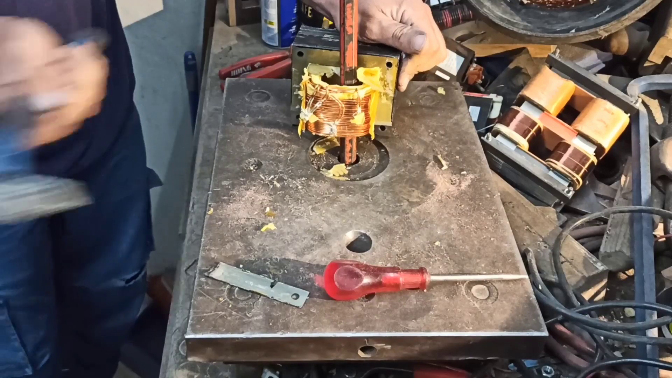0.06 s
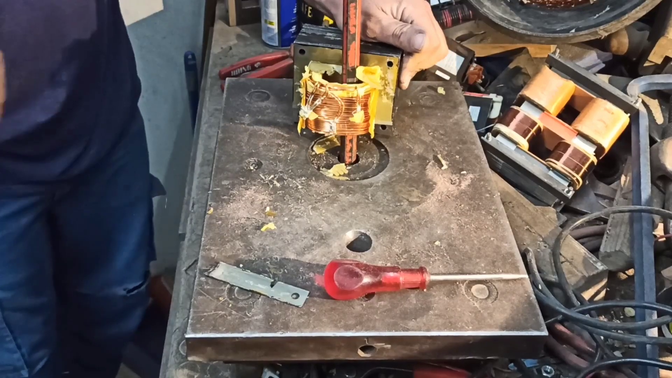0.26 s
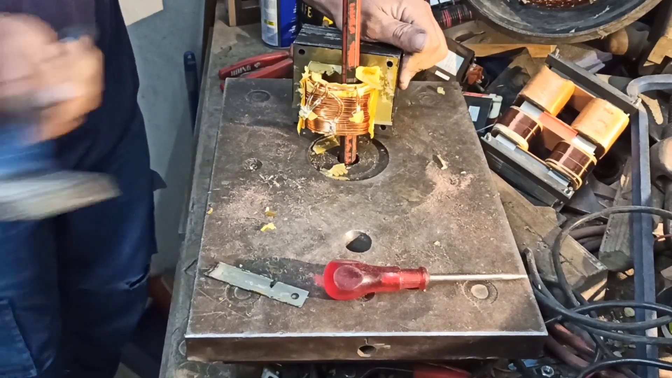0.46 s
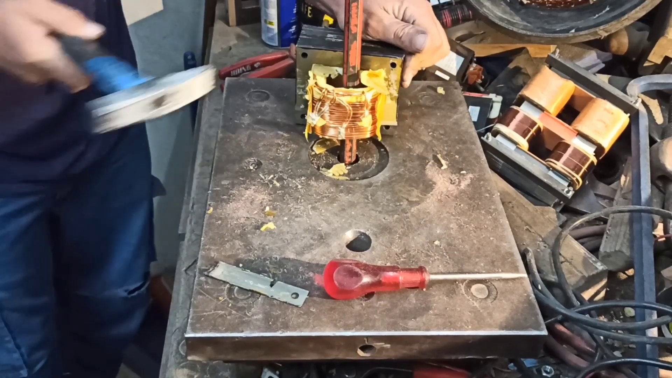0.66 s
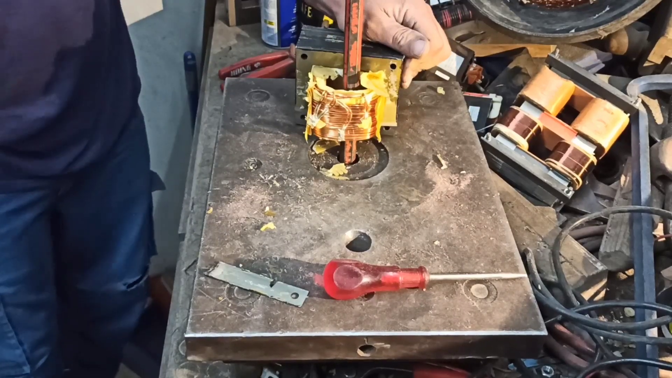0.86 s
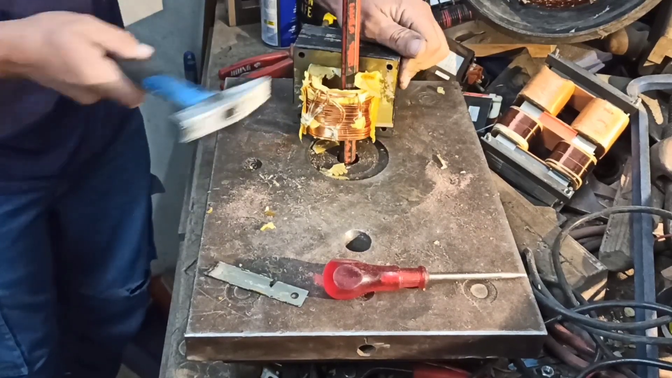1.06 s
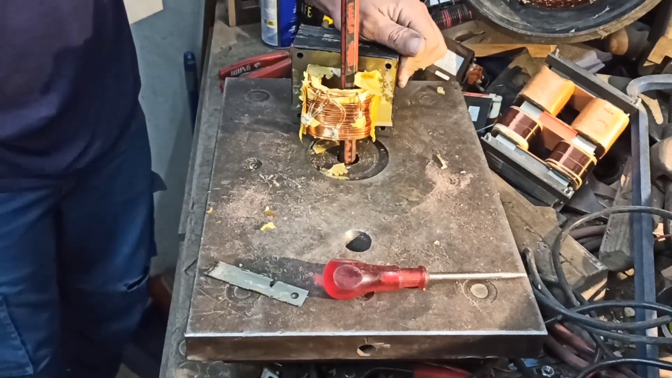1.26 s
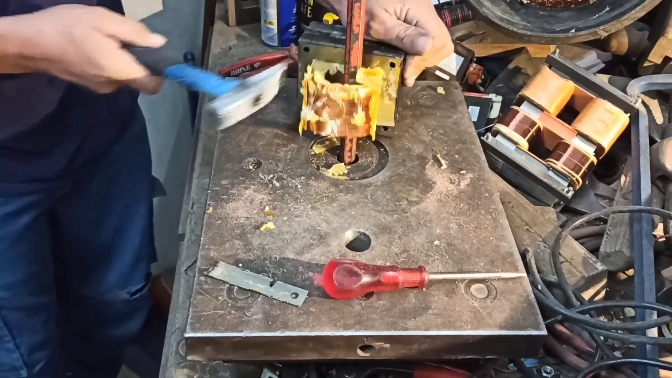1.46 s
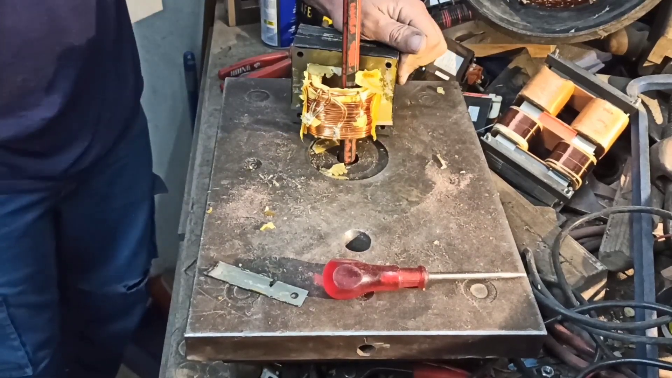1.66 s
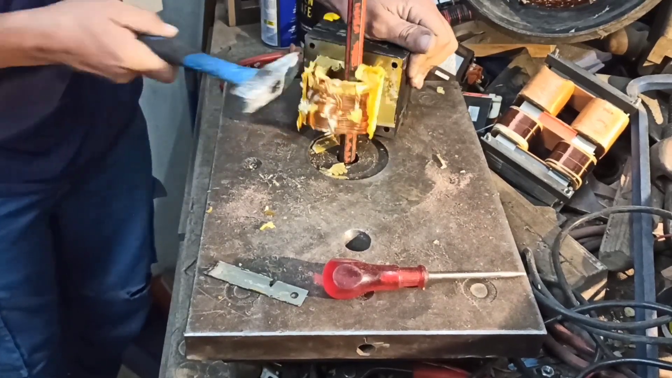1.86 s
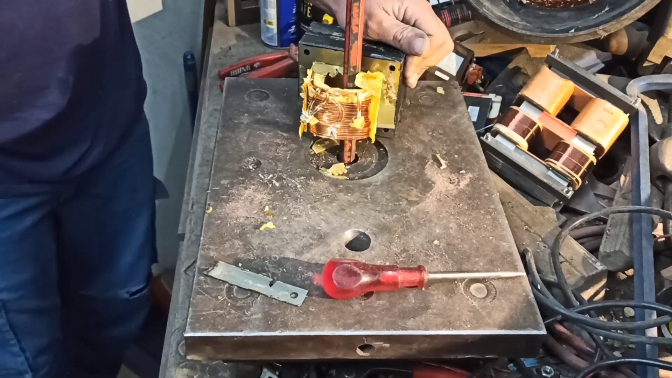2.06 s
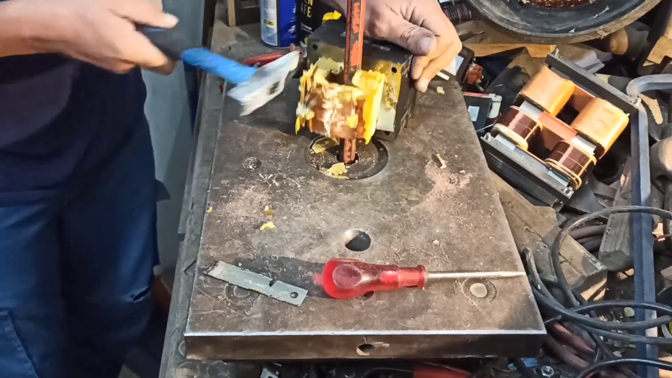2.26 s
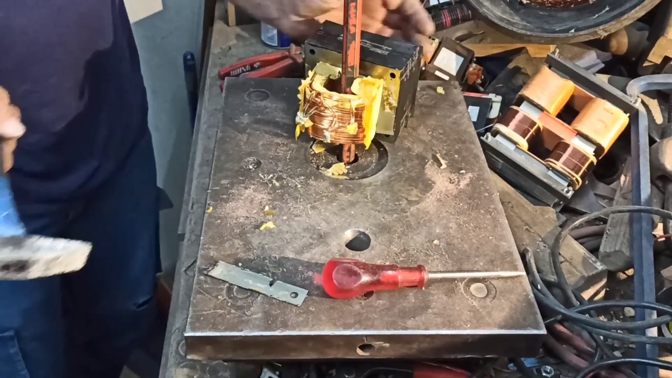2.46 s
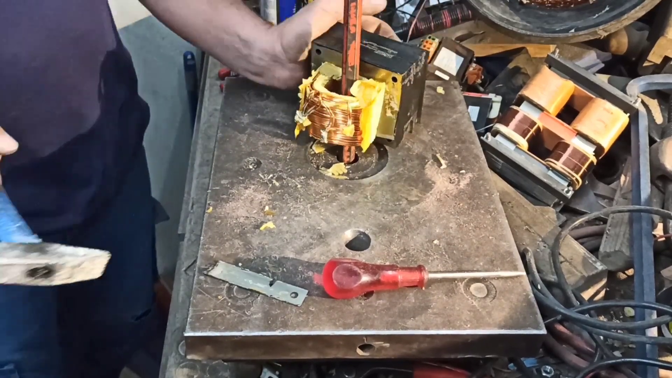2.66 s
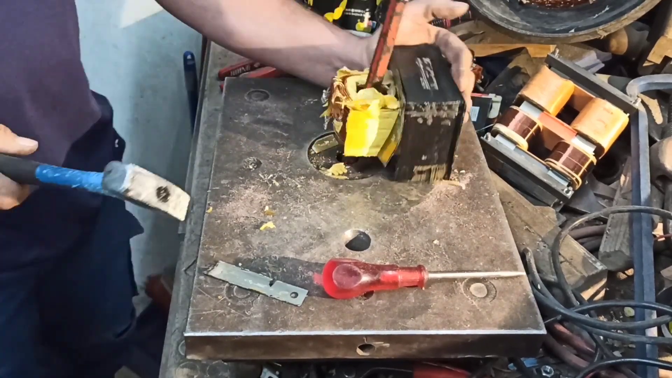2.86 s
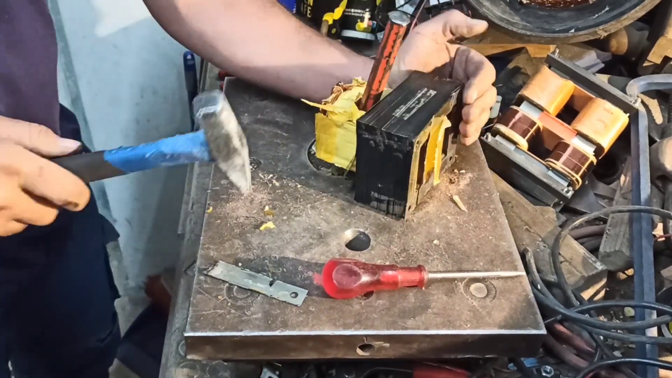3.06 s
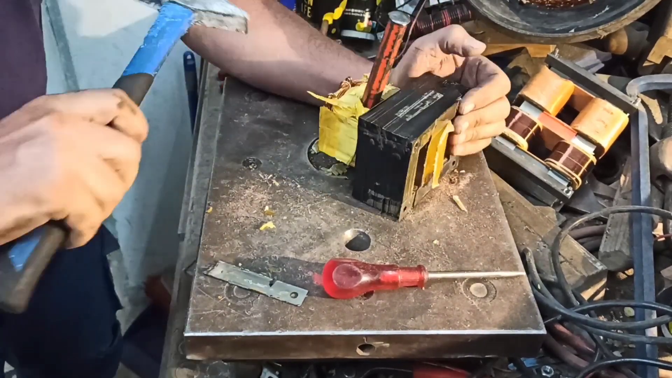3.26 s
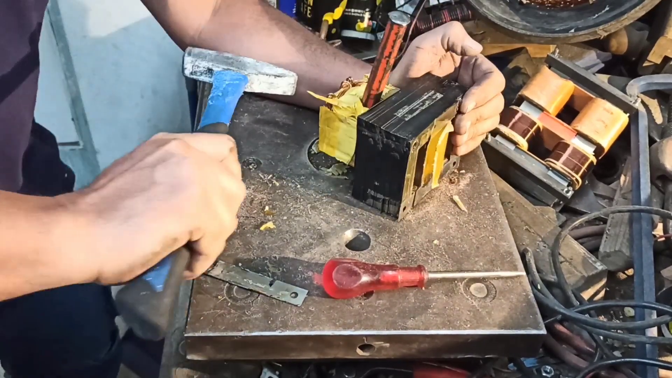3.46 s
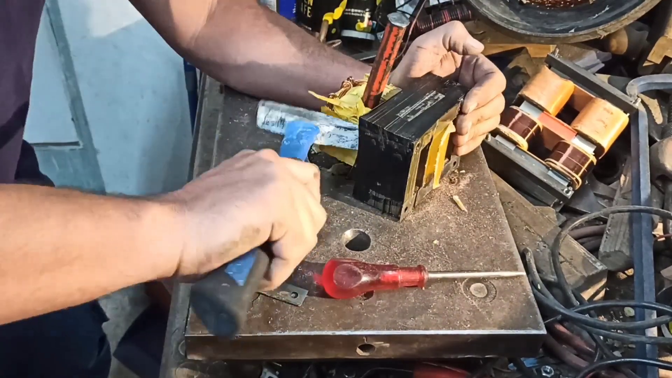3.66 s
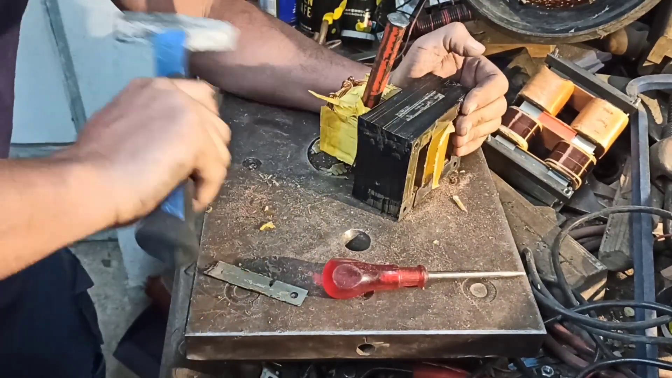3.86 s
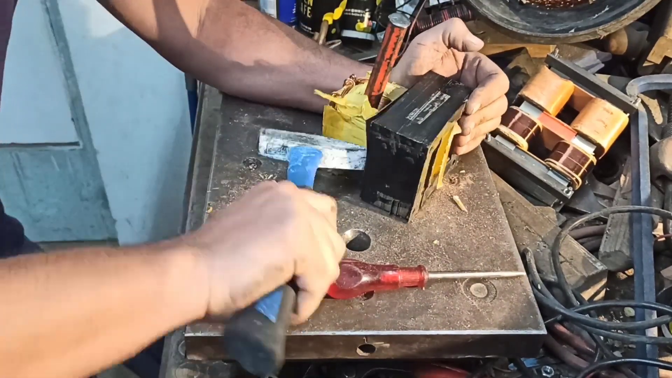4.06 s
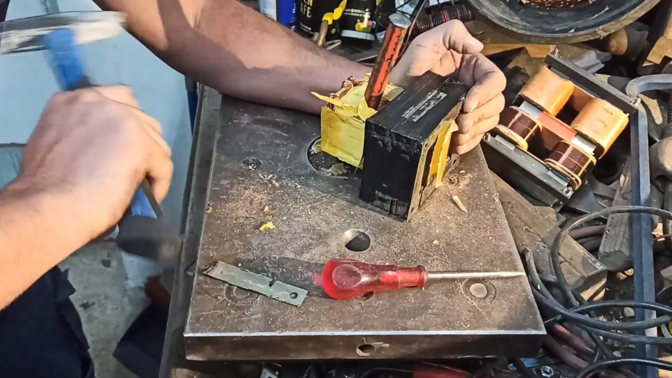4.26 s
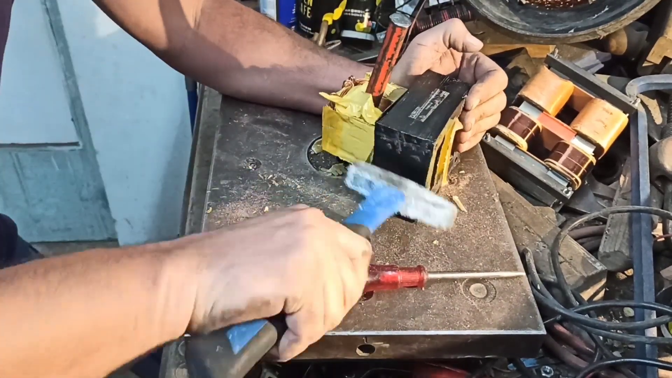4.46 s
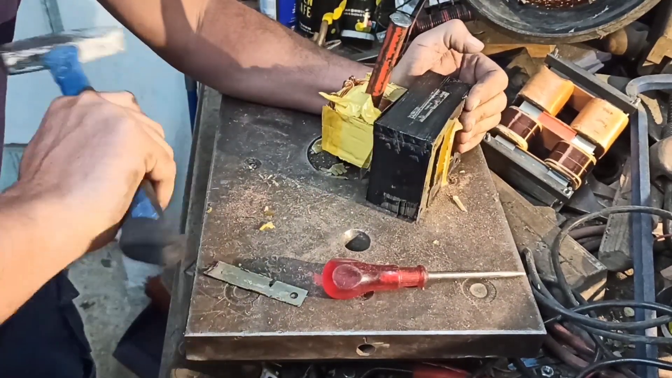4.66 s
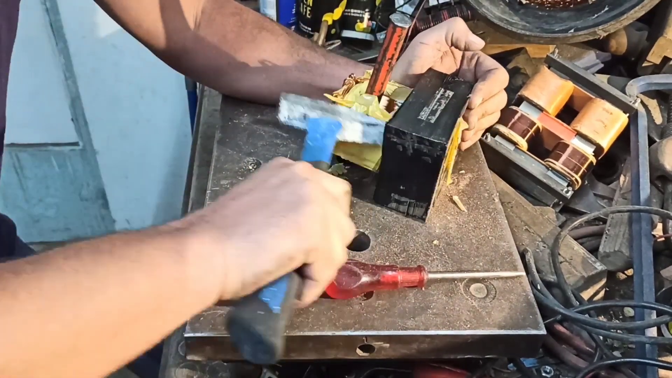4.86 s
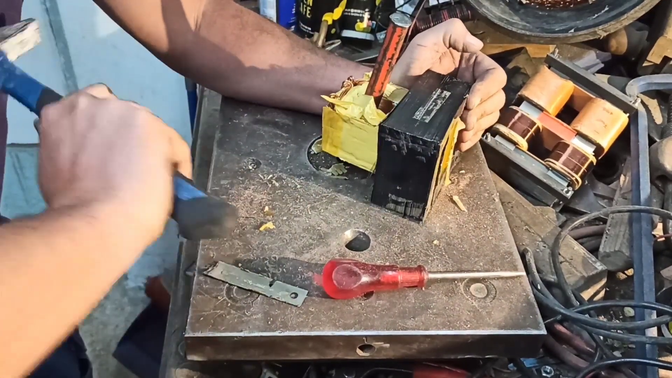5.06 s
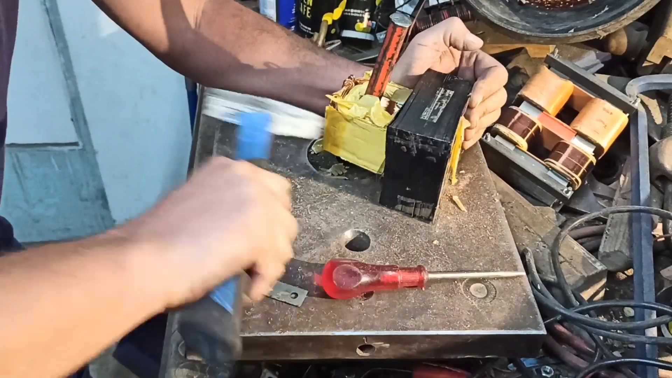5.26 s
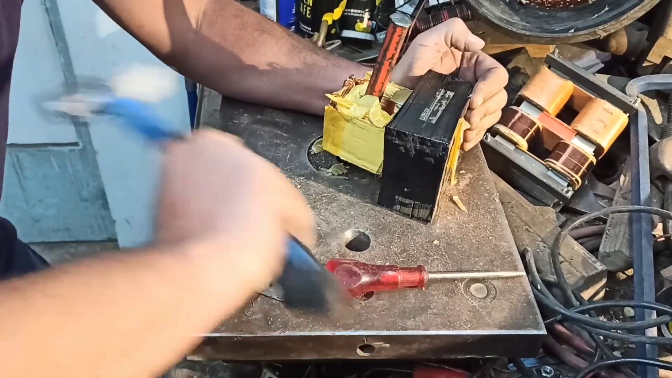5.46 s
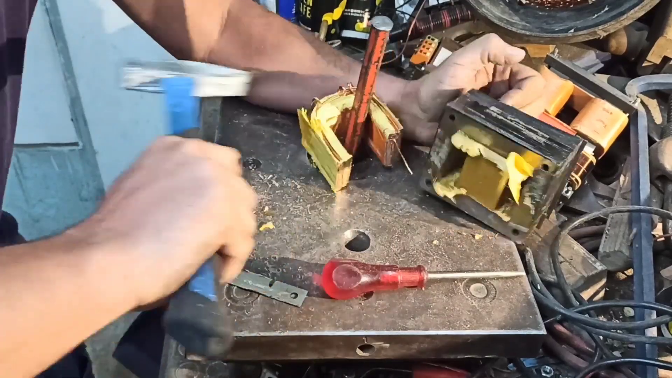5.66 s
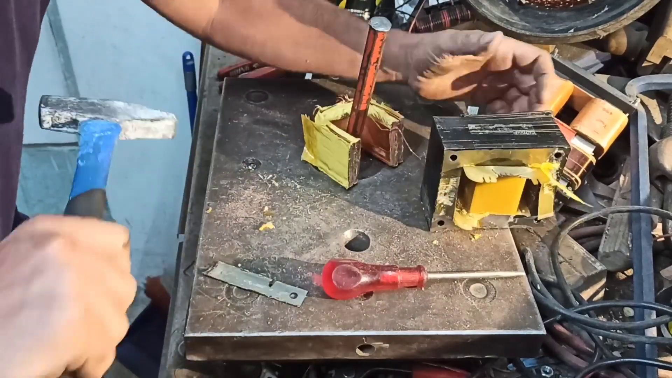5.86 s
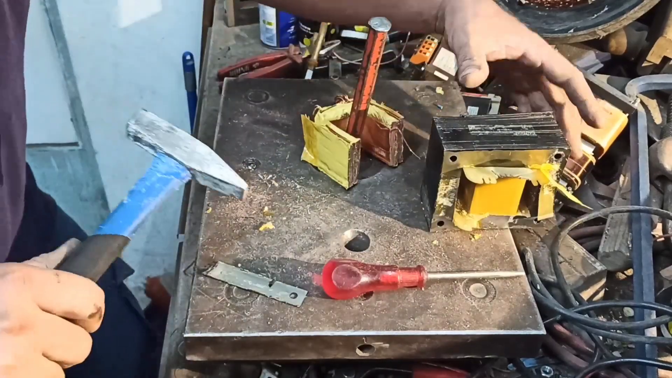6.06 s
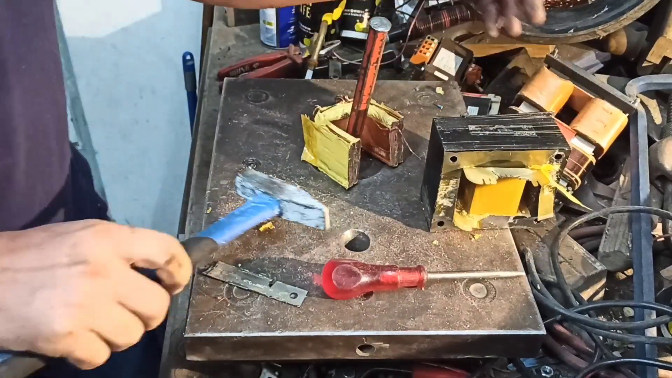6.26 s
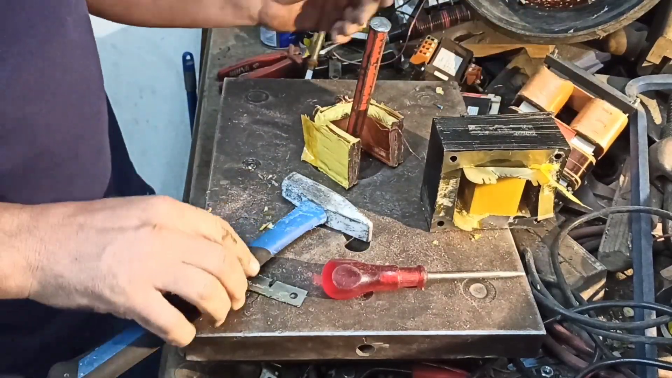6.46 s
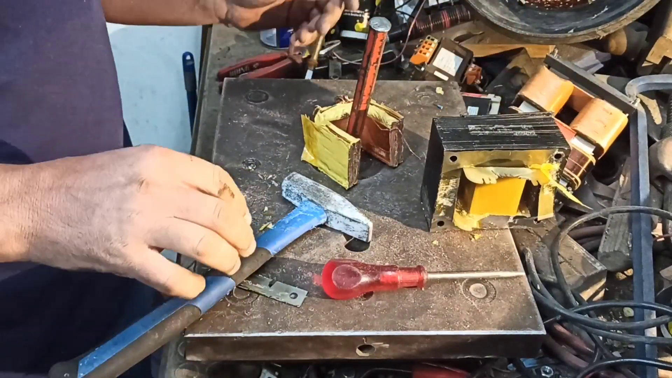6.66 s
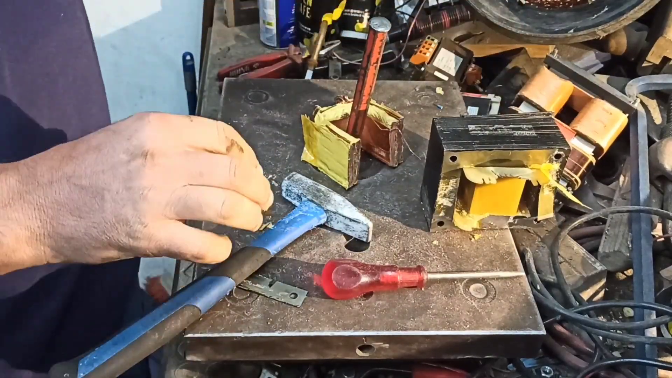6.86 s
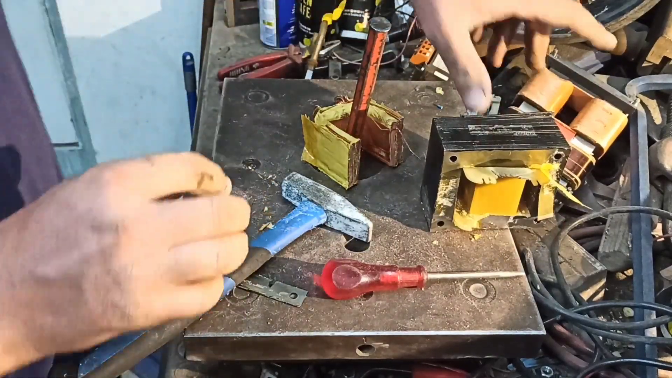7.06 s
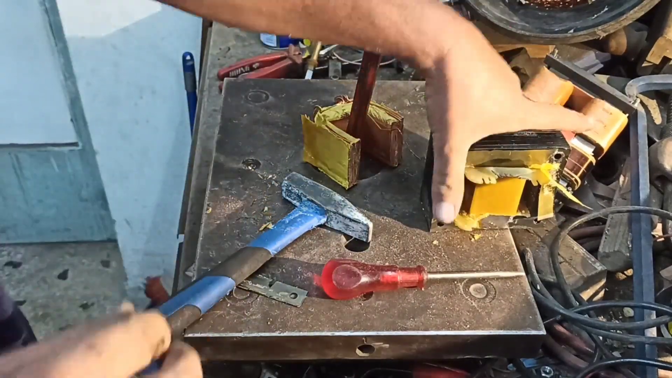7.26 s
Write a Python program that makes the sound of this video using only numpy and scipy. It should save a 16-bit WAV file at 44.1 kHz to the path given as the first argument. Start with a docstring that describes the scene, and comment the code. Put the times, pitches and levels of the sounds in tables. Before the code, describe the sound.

Close in a hard-walled workshop, a hammer strikes a laminated transformer core six times, each blow a dull bench thud with a sharp metallic crack and short echo. The core drags and a punch clinks. After a light tap come five brisker blows; the core knocks loose and the hammer clatters down on the steel plate.

```python
"""A steel hammer drives the laminated core out of a small transformer, held on a punch over a steel plate.
Each blow is a dull bench thud plus a crack of filtered noise and ringing modes, with a hard-walled workshop's echo.
Steady blows, then the core is dragged round and the punch clinks; a light tap and five more blows follow,
the core tumbles free and the hammer is laid down, over room air and a far machine's faint whine.
A limiter ducks on each blow and recovers about as fast as the room dies, so the echo hangs for a moment."""
import sys
import numpy as np
from scipy import signal
from scipy.fft import rfft, irfft
from scipy.io import wavfile
from scipy.ndimage import uniform_filter1d, minimum_filter1d

SR = 44100
rng = np.random.default_rng(int(sys.argv[2]) if len(sys.argv) > 2 else 0)


def wav_out(sig):
    """Save sig, one row per channel (or a flat mono array), as 16-bit PCM at SR to the path in sys.argv[1]."""
    wavfile.write(sys.argv[1], SR, np.round(np.clip(np.atleast_2d(sig).T, -1, 1) * 32767).astype(np.int16))


N = 321930
AGE = np.arange(SR) / SR   # seconds since a contact

# Hammer blows. Each row: start in seconds, force in dB, bench thud in dB relative to the force,
# room echo in dB, clang of the spot that is hit in Hz, and that clang's level in dB.
BLOWS = [(-.25, -4, -6.5, 1.5, 1280, -8), (0.162, 8, -10, -8.5, 1210, -6.5),
         (0.579, 7.5, -8, -9, 1206, -0.5), (1.039, 7, -0.5, -7.5, 1295, -6.5),
         (1.453, 7.5, -8.5, -8.5, 1440, -6), (1.86, 7, -6.5, -8, 834, -3.5), (2.252, 7, -10, -7, 1205, 0),
         (3.672, -12.5, -10, -6, 976, -25.5), (4.123, 4, -11, -11, 3540, 2.5),
         (4.483, 5.5, -9.5, -12.5, 1800, -0.5), (4.878, 3.5, -5.5, -10.5, 1560, -9),
         (5.222, 4.5, -5.5, -9, 940, -6), (5.554, 7, -5.5, -10, 1226, -17)]
# Spectrum of the crack. Each row: frequency in Hz, density in dB per Hz.
CRACK_SPECTRUM = [(60, -9.5), (250, 1.5), (550, -2.5), (850, 7.5), (1300, 0), (2300, 2), (3600, 3),
                  (7500, 6), (12000, 1), (15500, 0)]
# Spectrum a blow sends into the room. Each row: frequency in Hz, density in dB per Hz.
BLOW_ECHO_SPECTRUM = [(40, -12.5), (80, 4), (190, -7), (290, -3.5), (450, -5), (950, 0.5), (1600, 2.5),
                      (2600, -1.5), (4400, 5), (7500, 9), (12000, 0), (15500, 6)]
BLOW_TILT_DB = -0.5   # brightness of every blow, per octave
# Bench and plate rumbling on after a blow. Each row: frequency in Hz, level in dB, t60 in seconds.
BENCH_MODES = [(72.3, -32.5, 0.46), (87.65, -33, 0.29), (271.4, -30.5, 0.17)]
# Broad resonances of core and punch. Each row: frequency in Hz, width in Hz, level in dB.
CORE_PEAKS = [(888, 35, -10.5), (1082, 70, -7), (1250, 20, -15), (1480, 45, -15.5), (1660, 120, -8),
              (4650, 140, -7), (6360, 75, -4.5), (6550, 68, -7.5), (7500, 160, -8)]
# Loose iron knocking on the plate and in the scrap. Each row: start in seconds, level in dB,
# brightness in dB per octave, room echo in dB, clang in Hz.
KNOCKS = [(2.925, -39, -23, -15, 1320), (2.966, -29, -13, -4, 1450), (3.296, -45, -3.5, -27, 1300),
          (3.334, -35.5, 1.5, -20, 1454), (5.721, -20.5, 11, -18, 4650), (5.797, -21.5, 3, -14, 1280),
          (5.807, -26, 14, -10.5, 1620), (5.858, -32.5, -3.5, -18, 1510), (6.189, -58.5, 10, 9.5, 4620),
          (6.205, -52.5, -5, 8.5, 1630), (6.288, -49, -2, -4.5, 3300), (7.222, -46, -2, 6, 2750)]
# The punch clinks against the core. Each row: start in seconds, level in dB,
# brightness in dB per octave, room echo in dB, clang in Hz.
CLINKS = [(2.877, -27, -4, -14, 2500), (2.912, -35, -9, -21, 2830), (3.08, -51.5, 2, -5, 2650)]
# Ringing of the punch. Each row: frequency in Hz, level in dB, t60 in seconds.
PUNCH_MODES = [(1530, -20, 0.57), (2550, -12, 0.17), (2800, -15, 0.24), (3460, -31, 0.25),
               (4700, 12, 0.061), (4670, -10, 0.47), (7530, -8, 0.24)]
# The hammer head settles on the plate. Each row: start in seconds, level in dB,
# brightness in dB per octave, room echo in dB, clang in Hz.
HAMMER_DOWN = [(6.389, -20, -1.1, -14.5, 1490), (6.413, -25, -4, -7, 1590), (6.452, -24, -6, -11.5, 1040),
               (6.470, -25, 1.5, -5.5, 1590), (6.484, -29.5, -0.5, -24, 970)]
# Ringing of the hammer head on the plate. Each row: frequency in Hz, level in dB, t60 in seconds.
HAMMER_MODES = [(956, -21, 0.14), (1172, -10, 0.11), (1570, -14.5, 0.27), (3420, 2, 0.024),
                (4550, -1, 0.029), (13222, -36, 0.21), (13240, -28, 0.23)]
# Spectrum of light steel contacts. Each row: frequency in Hz, density in dB per Hz.
CLATTER_SPECTRUM = [(25, -26.5), (70, -8), (140, 2.5), (300, 0), (550, -2), (1200, 3.5), (2500, 2),
                    (4500, 6), (8000, 2), (15000, -19)]
# The core bumps dully on the plate. Each row: start in seconds, level in dB.
BUMPS = [(2.714, -51), (2.98, -36), (3.327, -50), (3.689, -27), (5.717, -27.5), (5.809, -28.5),
         (5.919, -32.5), (7.079, -40.5)]
# Low modes of the plate under a bump. Each row: frequency in Hz, level in dB, t60 in seconds.
BUMP_MODES = [(142, -2, 0.052), (206, -11, 0.029), (288, 3.5, 0.049), (337, 0, 0.039)]
# Steel dragged over the plate, first the core, at last the hammer.
# Each row: start in seconds, length in seconds, starting level in dB.
DRAGS = [(2.764, 0.25, -37.5), (3.326, 0.01, -46.5), (5.628, 0.016, -35.5), (5.738, 0.085, -38.5),
         (6.417, 0.068, -40)]
DRAG_ATTACK_DB_PER_S, DRAG_SWELL_DB_PER_S, DRAG_RELEASE_DB_PER_S = 298, 25, 178
# Spectrum of the plate rumbling under a drag. Each row: frequency in Hz, density in dB per Hz.
SCRAPE_SPECTRUM = [(40, -27), (90, -9), (190, -1.5), (300, 3.5), (420, -12), (650, -14.5), (1300, -14.5),
                   (2300, -25.5), (4500, -27), (9000, -36.5)]
# Decay of the room. Each row: frequency in Hz, t60 in seconds.
ROOM_T60 = [(80, 0.54), (300, 0.42), (1000, 0.44), (3000, 0.48), (7000, 0.42), (10000, 0.34), (15000, 0.22)]
# Spectrum of the workshop air. Each row: frequency in Hz, density in dB per Hz.
AIR_SPECTRUM = [(25, -29), (70, 1.5), (130, -6), (215, -3), (300, -6.5), (450, -7), (600, -12),
                (1050, -18.5), (1300, -22), (4000, -29), (7000, -28.5), (10000, -37), (15000, -35.5)]
AIR_DB = -54
# Level of the far machine's whine. Each row: time in seconds, level in dB.
WHINE = [(3.6, -67), (6.0, -64)]
# Stepped treble colour: the edges between bands, each entry in Hz.
TONE_EDGES_HZ = [4750, 6100, 7700, 8550, 9400, 10200, 11570]
# Gain of each band, from below the first edge to above the last, each entry in dB.
TONE_DB = [-4.5, -10.5, -3.5, -2.5, -19, -21, -23, -4]
CUTOFF_HZ = 15450


def hammering(thud_hz=95, thud_t60=0.048, thud_lead_s=0.0041, thud_rise_s=0.0013, bite_s=0.0011,
              clang_t60=0.026, rebound_s=0.016, rebound_db=-10):
    """Each blow shoves the heavy bench, which thuds and rumbles on, and cracks through the laminations."""
    out = np.zeros(N)
    thud = np.sin(2 * np.pi * thud_hz * AGE) * dying(thud_t60) * (1 - np.exp(-AGE / thud_rise_s))
    bite = 1 - np.exp(-AGE / bite_s)   # the stack of sheets takes a moment to close up
    for s, force_db, thud_db, room_db, clang_hz, clang_db in BLOWS:
        modes = BENCH_MODES + [(clang_hz, clang_db, clang_t60)]
        crack = bite * impact(CRACK_SPECTRUM, BLOW_ECHO_SPECTRUM, modes, BLOW_TILT_DB, room_db,
                              contact_s=0.0049, crack_t60=0.022, snap_db=-3)
        # the core jumps and lands again
        rebound = coloured(rng.standard_normal(SR), CLATTER_SPECTRUM) * dying(0.034)
        add(out, s - thud_lead_s, amp(force_db + thud_db) * thud)
        add(out, s, amp(force_db) * resonant(crack, CORE_PEAKS))
        add(out, s + rebound_s, amp(force_db + rebound_db) * rebound)
    return out


def impact(crack, echo, modes, tilt_db, room_db, contact_s, crack_t60, snap_db):
    """Steel on steel: a snap, a noisy crack while the parts chatter, a few longer rings, then the room."""
    # the crack holds its level during contact, then dies away
    chatter = np.exp(-np.log(1000) * np.maximum(AGE - contact_s, 0) / max(crack_t60, 1e-3))
    snap = amp(snap_db) * dying(0.0047)
    direct = coloured(rng.standard_normal(SR), crack, tilt_db) * (chatter + snap)
    room = amp(room_db) * workshop_echo(echo, tilt_db)
    return direct + ringing(modes, spread_db=2.5) + room


def ringing(modes, spread_db):
    """Each contact excites every decaying mode with a strength and polarity of its own."""
    chance = rng.standard_normal((len(modes), 2))
    out = np.zeros(SR)
    for (hz, db, t60), (strength, polarity) in zip(modes, chance):
        gain = amp(db + spread_db * strength) * np.sign(polarity)
        out += gain * dying(t60) * np.sin(2 * np.pi * hz * AGE)
    return out


def resonant(x, peaks):
    """Broad resonances lift their part of whatever passes through the body."""
    out = x.copy()
    for hz, width_hz, db in peaks:
        out += amp(db) * signal.lfilter(*signal.iirpeak(hz, hz / width_hz, fs=SR), x)
    return out


def workshop_echo(spectrum, tilt_db, build_s=0.0037, clump_db=1.3, clump_hz=110):
    """Reflections from the clutter build up in clumps, then die band by band at each band's own rate."""
    bins = rfft(coloured(rng.standard_normal(SR), spectrum, tilt_db))
    centres = np.log([hz for hz, t60 in ROOM_T60])
    log_hz = np.log(freqs(AGE) + 1)
    out = np.zeros(SR)
    # each share is a triangle that crossfades one band into its neighbours
    for share, (hz, t60) in zip(np.eye(len(centres)), ROOM_T60):
        band = irfft(bins * np.interp(log_hz, centres, share))
        out += band * dying(t60) * amp(clump_db * wander(clump_hz, SR))
    return out * (1 - np.exp(-AGE / build_s))


def light_contacts(events, modes, contact_s, crack_t60, clang_db, clang_t60):
    """Small knocks of one steel part; each spot clangs at its own pitch."""
    out = np.zeros(N)
    for s, level_db, tilt_db, room_db, clang_hz in events:
        rings = modes + [(clang_hz, clang_db, clang_t60)]
        knock = impact(CLATTER_SPECTRUM, CLATTER_SPECTRUM, rings, tilt_db, room_db,
                       contact_s, crack_t60, snap_db=-10.0)
        add(out, s, amp(level_db) * knock)
    return out


def bumping(soft_s=0.0026):
    """A padded, slow contact wakes only the plate's low modes."""
    out = np.zeros(N)
    soft_onset = 1 - np.exp(-AGE / soft_s)
    for s, level_db in BUMPS:
        add(out, s, amp(level_db) * ringing(BUMP_MODES, spread_db=-3.5) * soft_onset)
    return out


def dragging(slips_per_s=2000, size_db=1.5, grit_db=-18, catch_db=2.0, catch_hz=60):
    """Steel sticks and slips on the rusty plate: random clicks make the plate rumble and the grit crackle."""
    slips = (rng.random(N) < slips_per_s / SR) * rng.choice([-1, 1], N)
    slip_size_db = size_db * np.minimum(rng.exponential(1, N), 4)
    slips = slips * amp(slip_size_db + catch_db * wander(catch_hz, N))
    rumble = coloured(slips, SCRAPE_SPECTRUM)
    grit = amp(grit_db) * coloured(slips, CLATTER_SPECTRUM)
    return drag_pressure() * (rumble + grit)


def drag_pressure():
    """Every drag gets going quickly, swells as the hand bears down, and runs out."""
    t = np.arange(N) / SR
    out = np.zeros(N)
    for s, length_s, level_db in DRAGS:
        attack = DRAG_ATTACK_DB_PER_S * np.maximum(s - t, 0)
        swell = DRAG_SWELL_DB_PER_S * np.clip(t - s, 0, length_s)
        release = DRAG_RELEASE_DB_PER_S * np.maximum(t - s - length_s, 0)
        out += amp(level_db - attack + swell - release)
    return out


def background():
    """Workshop air, as steady coloured noise, with a far machine's whine in it."""
    return amp(AIR_DB) * coloured(rng.standard_normal(N), AIR_SPECTRUM) + far_whine()


def far_whine(whine_hz=985, width_hz=75):
    """Faint, rough whine of a far machine: noise through a narrow resonance."""
    resonance = signal.iirpeak(whine_hz, whine_hz / width_hz, fs=SR)
    narrow = signal.lfilter(*resonance, signal.lfilter(*resonance, rng.standard_normal(N)))
    # saturation evens the level, so it wavers more in pitch
    whine = signal.lfilter(*resonance, np.tanh(2 * rms_one(narrow)))
    whine_db = np.interp(np.arange(N) / SR, *np.transpose(WHINE))
    return amp(whine_db) * rms_one(whine)


def amp(db):
    """Decibels to gain."""
    return 10 ** (np.asarray(db) / 20)


def rms_one(x):
    """Scale to unit rms."""
    return x / np.sqrt(np.mean(x ** 2) + 1e-20)


def at_hz(points, hz):
    """Read a table on a log-frequency axis."""
    f, value = np.transpose(points)
    return np.interp(np.log(np.maximum(hz, 1)), np.log(f), value)


def freqs(x):
    """Frequency in Hz of each bin of a signal's spectrum."""
    return np.fft.rfftfreq(len(x), 1 / SR)


def coloured(x, spectrum, tilt_db=0):
    """Filter a signal by a spectrum, tilted per octave above 150 Hz; rms 1."""
    tilt = tilt_db * np.log2(np.maximum(freqs(x), 150))
    return rms_one(irfft(rfft(x) * amp(at_hz(spectrum, freqs(x)) + tilt), len(x)))


def add(track, s, sound):
    """Mix in the part of a sound that falls within the track."""
    start = round(s * SR)
    track[max(start, 0):start + len(sound)] += sound[max(-start, 0):N - start]


def dying(t60):
    """Free decay after a contact, 60 dB down after t60 seconds."""
    return np.exp(-np.log(1000) * AGE / max(t60, 1e-3))


def wander(rate_hz, count):
    """Random curve of unit spread about 0: straight lines between rate_hz new values a second."""
    knots = rng.standard_normal(2000)
    return np.interp(np.arange(count) * rate_hz / SR, np.arange(len(knots)), knots)


def scene():
    """All the work at the bench, over the workshop's background."""
    core = light_contacts(KNOCKS, [], contact_s=0.0011, crack_t60=0.033, clang_db=-5, clang_t60=0.034)
    punch = light_contacts(CLINKS, PUNCH_MODES, contact_s=0.0011, crack_t60=0.084,
                           clang_db=-4, clang_t60=0.11)
    hammer = light_contacts(HAMMER_DOWN, HAMMER_MODES, contact_s=0.0033, crack_t60=0.013,
                            clang_db=6, clang_t60=0.027)
    return (hammering() + core + punch + hammer + bumping() + dragging() + background())[None]


def tone_colour(x, low_cut_hz=40, size=1601):
    """A short linear-phase equaliser: a low cut and stepped treble bands."""
    hz = np.linspace(0, SR / 2, size)
    low_cut = hz ** 2 / (hz ** 2 + low_cut_hz ** 2)
    gains = amp(TONE_DB)[np.searchsorted(TONE_EDGES_HZ, hz)] * low_cut
    return signal.fftconvolve(x, signal.firwin2(size, hz, gains, fs=SR, window="blackman"), "same")


def limiter(x, ceiling_db=-10.5, release_db_per_s=150, window_s=0.0022, ahead_s=0.0047):
    """Looks ahead, ducks whatever exceeds the ceiling and recovers at a steady rate."""
    power = uniform_filter1d(x ** 2, max(int(window_s * SR), 1))
    over_db = np.maximum(10 * np.log10(np.maximum(power, 1e-12)) - ceiling_db, 0)
    ramp_db = release_db_per_s * np.arange(N) / SR
    duck_db = np.maximum.accumulate(over_db + ramp_db) - ramp_db
    reach = max(int(ahead_s * SR), 1)   # samples
    return x * amp(uniform_filter1d(minimum_filter1d(-duck_db, reach), reach))


def record(dry, top=0.54):
    """Tone colour, limiter, rounded peaks, steep top cut."""
    limited = limiter(tone_colour(dry[0]))
    rounded = top * np.tanh(limited / top)
    low_pass = signal.ellip(10, .2, 80, CUTOFF_HZ, fs=SR, output="sos")
    return signal.sosfilt(low_pass, rounded)[None]


dry = scene()
out = record(dry)
wav_out(out)
```